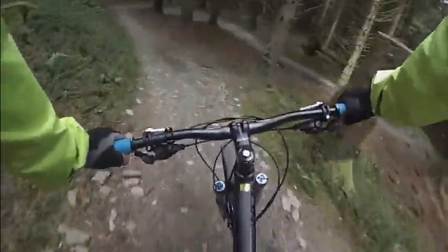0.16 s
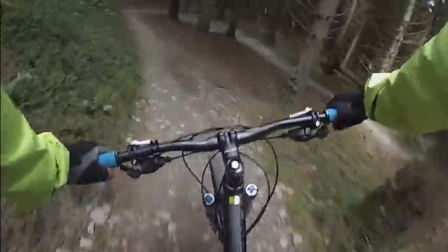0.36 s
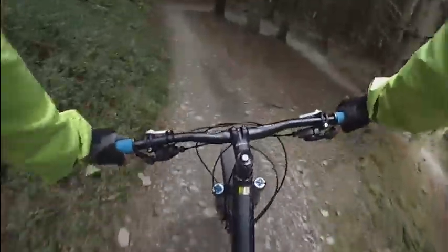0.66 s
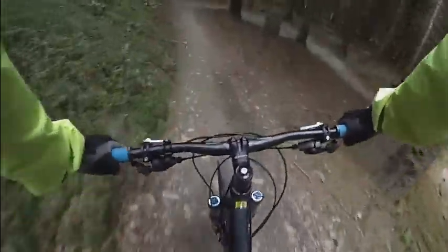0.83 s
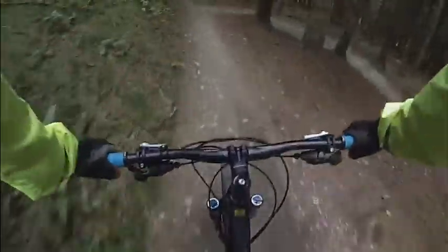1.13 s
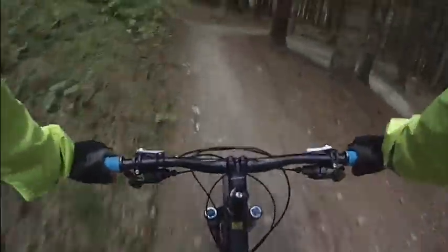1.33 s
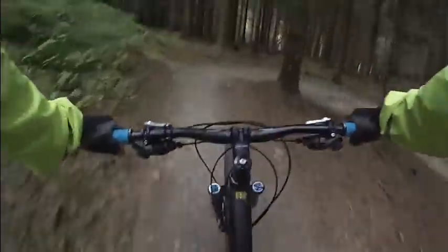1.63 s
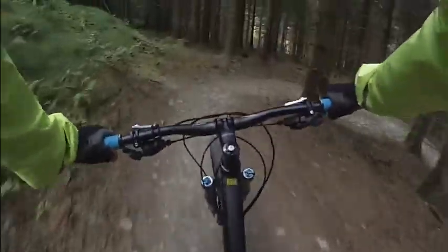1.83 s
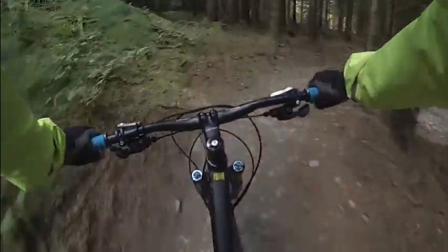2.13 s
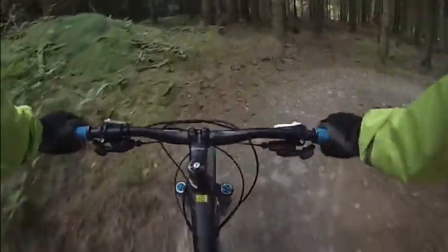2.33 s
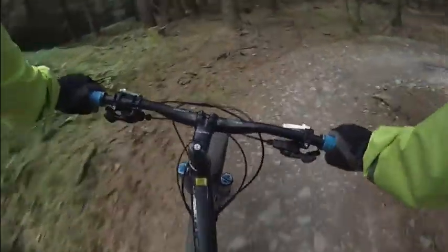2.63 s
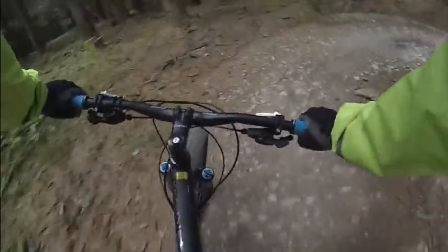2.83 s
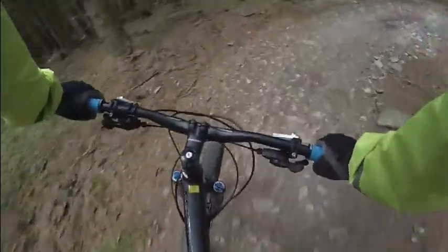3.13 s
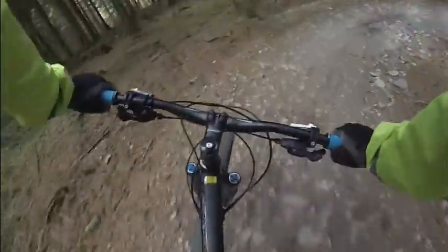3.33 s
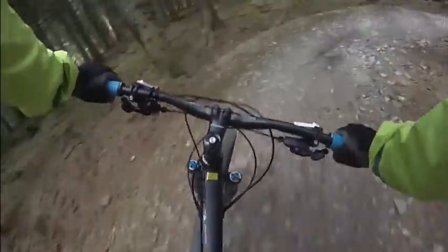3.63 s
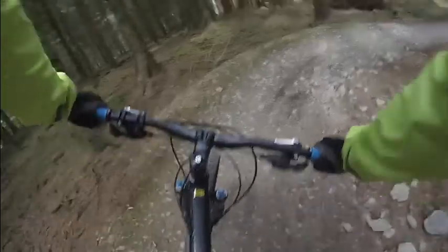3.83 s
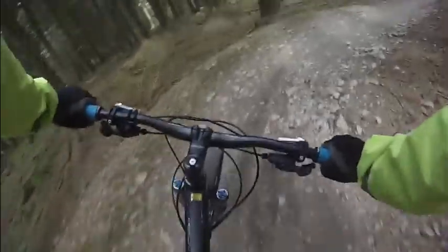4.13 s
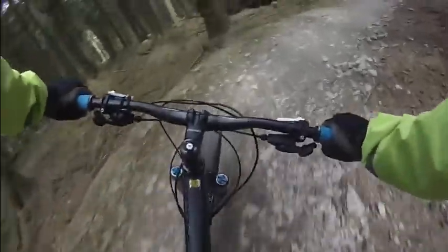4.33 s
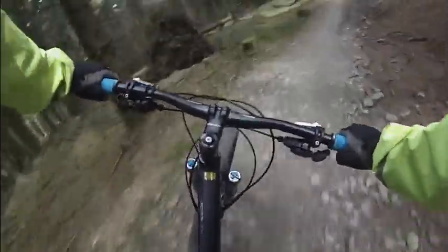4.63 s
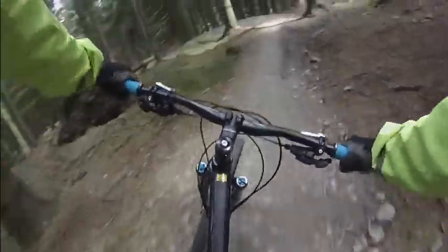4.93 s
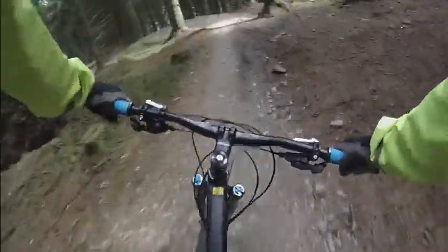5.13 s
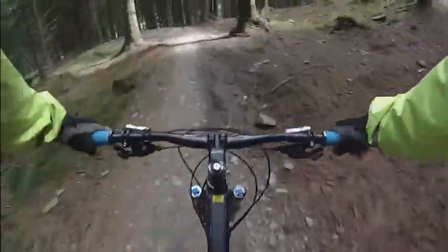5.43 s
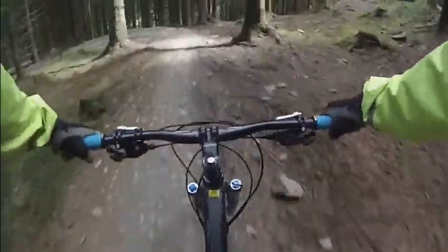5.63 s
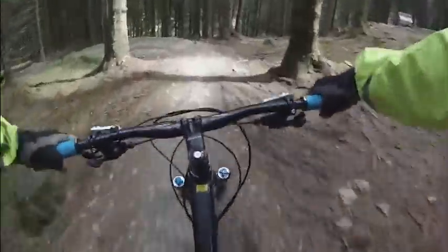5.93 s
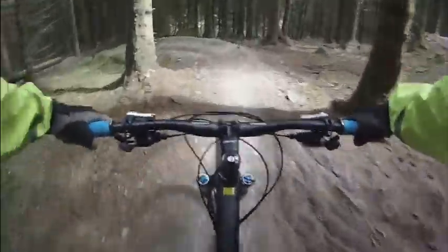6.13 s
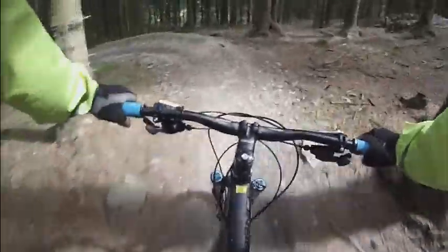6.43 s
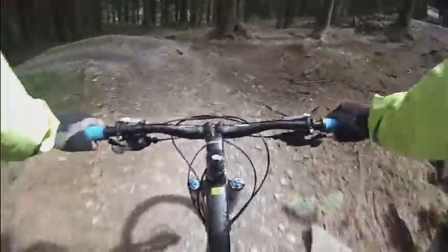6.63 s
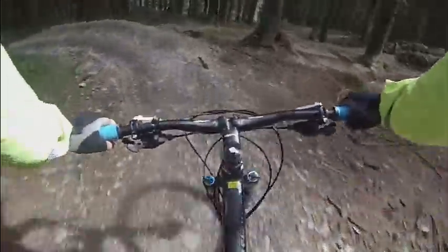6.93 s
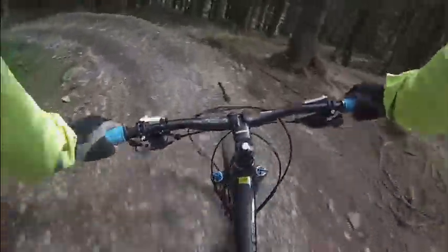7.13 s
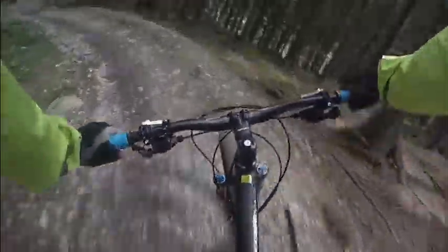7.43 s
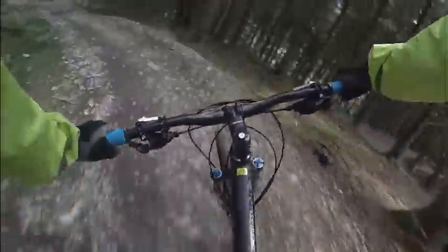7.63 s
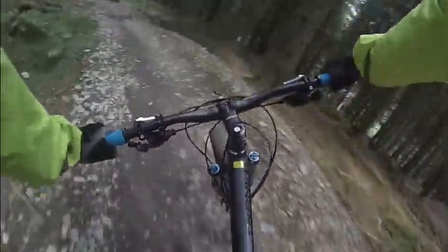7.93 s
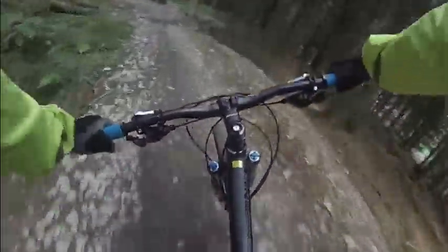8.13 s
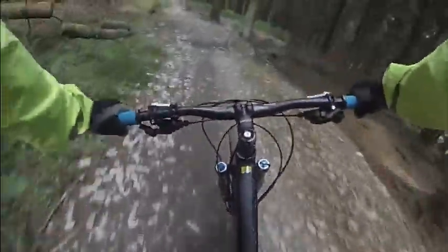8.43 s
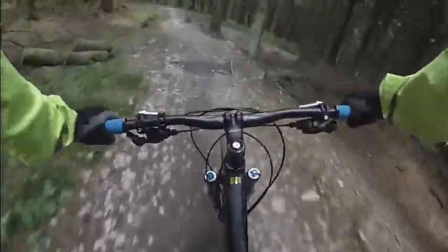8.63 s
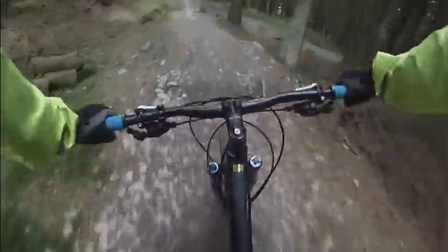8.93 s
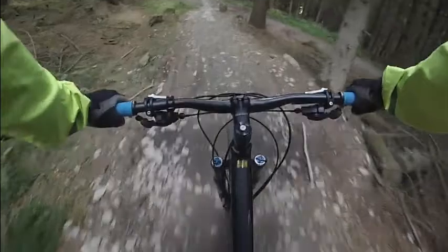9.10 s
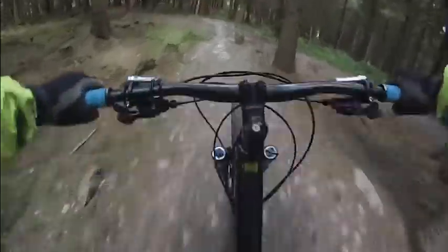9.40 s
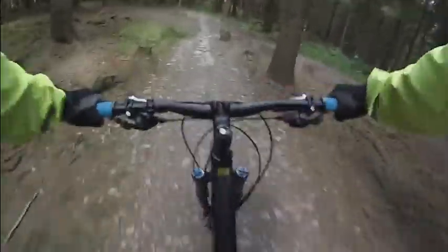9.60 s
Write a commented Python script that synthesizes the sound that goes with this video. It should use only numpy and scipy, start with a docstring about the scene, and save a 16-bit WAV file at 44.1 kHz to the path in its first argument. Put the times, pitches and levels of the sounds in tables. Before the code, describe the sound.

Hard, dry clacks from a loose part on a mountain bike snap loudly over quiet tyre rumble and gritty crunch on a forest dirt trail.

```python
"""Hard clacks over the rumble and crunch of a mountain bike on a dirt trail, heard by the rider's microphone.
A loose hard part near the microphone clacks as decaying sines plus gritty noise; it may rebound or slide.
Tyre rumble, grit and wind are coloured noises that follow how hard the bike rolls.
Stone patches are noise bursts, tyre thumps are decaying sines and gusts are single pressure dips.
A slow limiter ducks everything after a peak and the input flattens what is too loud."""
import sys
import numpy as np
from scipy import signal
from scipy.fft import rfft, irfft, next_fast_len
from scipy.io import wavfile

SR = 44100
rng = np.random.default_rng(int(sys.argv[2]) if len(sys.argv) > 2 else 0)


def log_audio(samples):
    """Write samples as a 16-bit WAV file to the path given in sys.argv[1]."""
    # one column per channel
    frames = np.atleast_2d(samples).T
    # limit to full scale, then quantise
    limited = np.clip(frames, -1, 1)
    pcm = np.round(limited * 32767).astype(np.int16)
    wavfile.write(sys.argv[1], SR, pcm)


N = 430416
TIME = np.arange(N) / SR

# blows of the loose part: (time [s], force [dB], contact grit relative to force [dB],
# rebound [share of force], later slide [gain, 1 = firm, 0 = none])
CLACKS = [(0.0022, 2.5, 7, 0, 0), (1.4625, 8.5, -4.5, 0, 0), (1.5909, 13, 5, 0.081, 0),
          (1.723, 13, -8, .14, .9), (1.9555, -7.5, -14, 0, 0), (2.1207, -0.5, 3, 0.024, 0),
          (2.399, -1.5, -4, 0, 0.16), (2.664, 0, -2, 0.032, 0), (2.73, -23.5, -22, 0.038, 0),
          (4.0001, 10.5, -3.5, .1, 0), (4.381, -47, 2, 0, 0), (4.848, -38.5, 11.5, 0, 0),
          (4.9095, 3.5, -6.5, 0, 0), (5.1151, 1.6, -2.5, 0, 0.11), (5.2153, -45.5, -5, 0.071, 0),
          (5.282, 6, 3.5, 0, 1), (5.4723, 6.5, -5, 0, 1.36), (5.685, -8, -16, 0.026, 0.98),
          (5.9173, 5, 3, 0, 0), (6.08, -19.5, -13, 0, 0.79), (6.259, 1, -12, 0.015, 0.38),
          (6.3607, -32.5, -11, 0.043, 0), (6.4993, 0, 8.5, 0.04, 0.34), (6.6302, -0.5, -3, 0, 0),
          (7.0888, 0.5, -9, 0, 0.6), (7.3411, -2, -18, 0.016, 0.9), (7.487, -38, 12, 0, 0.1),
          (7.5294, -0.6, -8, 0.024, 0), (7.7286, -0.3, -3, 0.022, 0.55), (7.9302, -2, -11, 0.23, 0.17),
          (8.0885, -6.5, 12.5, 0.41, 0.42), (8.278, -4, 6.5, 0.032, 0.036), (8.7962, -0.3, 0, 0, 0.21),
          (8.924, -1, -0.5, .15, 0), (9.0919, -2, -13.5, 0.19, 0.18), (9.3764, 4.5, -13, 0.2, 0.35),
          (9.487, 0.5, 10, 0.44, 0), (9.5059, -11.5, 2.5, 0, 0.58)]
# spectrum of the sliding or rattling part: (frequency [Hz], relative density [dB])
RUB_COLOUR = [(300, -20), (460, 3.5), (620, -25), (950, -4.5), (1450, 2.5), (2050, 0.5), (2700, -13),
              (4000, -33), (4800, -17), (5500, -22), (6300, -22.5), (7500, -39), (14000, -59.5)]


def from_db(db):
    """Decibels to gain."""
    return 10 ** (np.asarray(db) / 20)


def rms_one(x):
    """Scale to an rms of 1."""
    return x / np.sqrt(np.mean(x ** 2) + 1e-20)


def add(out, start_s, sound):
    """Mix a short sound into out at start_s."""
    start = int(np.clip(round(start_s * SR), 0, N - 1))
    out[start:start + len(sound)] += sound[:N - start]


def drift(corner_hz):
    """Smooth random curve of rms 1: noise through two equal low-pass poles, at 1/40 of the sample rate."""
    step, warmup = 40, 2000  # samples, slow samples
    pole = np.exp(-2 * np.pi * corner_hz * step / SR)
    white = rng.standard_normal(N // step + warmup + 2)
    slow = signal.lfilter([1], [1, -2 * pole, pole * pole], white)[warmup:]
    return np.interp(np.arange(N) / step, np.arange(len(slow)), rms_one(slow))


def coloured(x, spectrum):
    """Shape x by a spectrum that falls away below its first point; rms 1."""
    hz, db = np.transpose(spectrum)
    size = next_fast_len(N)
    f = np.fft.rfftfreq(size, 1 / SR) + 1  # +1 keeps the log finite
    gain = from_db(np.interp(np.log(f), np.log(hz), db))
    gain *= np.minimum(f / hz[0], 1) ** 2
    return rms_one(irfft(rfft(x, size) * gain, size)[:N])


def noise(spectrum):
    """Coloured noise of rms 1."""
    return coloured(rng.standard_normal(N), spectrum)


def swell(centre_s, length_s):
    """Raised-cosine bump of height 1."""
    return np.cos(np.pi * np.clip((TIME - centre_s) / length_s, -.5, .5)) ** 2


def struck(modes, count, spread_db, detune, pitch=1):
    """Struck body: decaying sines of alternating sign, with random level and tuning at each blow."""
    hz, db, t60_s = np.transpose(modes)[:, :, None]
    strength, shift = rng.standard_normal((2, len(modes), 1))
    t = np.arange(count) / SR
    sign = (-1) ** np.arange(len(modes))[:, None]
    decay = from_db(db + spread_db * strength - 60 * t / t60_s)
    sines = np.sin(2 * np.pi * hz * (pitch + detune * shift) * t)
    return np.sum(sign * decay * sines, axis=0)


def rolling(follows):
    """Gain that moves `follows` dB per dB of rolling level (speed and tyre load); 1 at an easy pace."""
    # rolling level, joined by straight lines: (time [s], level [dB])
    roll_curve = [(0.0, -70.5), (0.83, -61), (0.95, -51), (1.73, -57), (1.89, -70.5), (2.61, -62.5),
                  (2.79, -67.5), (3.31, -55), (3.73, -53.0), (3.93, -36), (4.09, -59), (4.27, -71),
                  (4.91, -56), (4.95, -71), (5.47, -70.5), (7.41, -66.5), (8.35, -66), (8.83, -60),
                  (9.05, -65), (9.47, -59), (9.76, -66.5)]
    easy_roll_db = -60
    roll_db = np.interp(TIME, *np.transpose(roll_curve))
    return from_db(follows * (roll_db - easy_roll_db))


def wind(wind_db=-47.5, follows=1.15, eddies_db=2.5, eddies_hz=9, buffet_highpass_hz=12):
    """Eddies make a low, fluctuating noise at the microphone; gusts add single pressure dips."""
    # wind spectrum: (frequency [Hz], relative density [dB])
    wind_colour = [(14, 4), (28, 3), (50, -9), (90, -17), (200, -34.5), (500, -67.5)]
    # gusts: (centre [s], length [s], peak before the high-pass [dB])
    buffets = [(1.083, 0.031, -17.5), (1.317, 0.026, -13.5), (3.889, 0.026, -5), (9.521, 0.018, -11.5)]
    eddies = from_db(wind_db + eddies_db * drift(eddies_hz)) * noise(wind_colour)
    dips = np.zeros(N)
    for centre_s, length_s, db in buffets:
        dips -= from_db(db) * swell(centre_s, length_s)
    highpass = signal.butter(1, buffet_highpass_hz, "high", fs=SR, output="sos")
    return rolling(follows) * eddies + signal.sosfilt(highpass, dips)


def tyre_rumble(tyre_db=-56, follows=1.1, lumps_db=5.5, lumps_hz=14):
    """Tyres drum on uneven ground: low noise of wandering level."""
    # tyre spectrum: (frequency [Hz], relative density [dB])
    tyre_colour = [(40, -12), (80, -1.5), (120, 2), (175, -4.5), (250, -18.5), (450, -19.5), (600, -31),
                   (2000, -59)]
    lumps = from_db(tyre_db + lumps_db * drift(lumps_hz))
    return rolling(follows) * lumps * noise(tyre_colour)


def grit(grains_per_s=1800, size_db=2.5, grain_db=-62, hiss_db=-62, clump_db=5.0, clump_hz=38, follows=.85):
    """Grains crack under the tread as random impulses, in clumps, over a smooth rush."""
    # grit spectrum: (frequency [Hz], relative density [dB])
    grit_colour = [(200, -10), (450, 0.5), (650, -3), (1000, -5), (1450, 6), (2200, 3.5), (2800, -3.5),
                   (3700, -4.5), (5000, -10), (6500, -16.5), (8000, -20), (11000, -28.5), (15000, -42)]
    is_grain = rng.random(N) < grains_per_s / SR
    size = np.minimum(rng.exponential(1, N), 4)
    sign = rng.choice([-1, 1], N)
    cracks = is_grain * sign * from_db(size_db * size)
    crunch = from_db(grain_db + clump_db * drift(clump_hz)) * coloured(cracks, grit_colour)
    rush = from_db(hiss_db) * noise(grit_colour)
    return rolling(follows) * (crunch + rush)


def stones(stone_db=-2, knock_db=4.0, knock_hz=120):
    """Tyres plough through loose stones: short, bright, uneven bursts of noise."""
    # stone patches: (centre [s], length [s], level before stone_db [dB])
    patches = [(0.344, 0.044, -50.5), (0.521, 0.012, -42), (0.685, 0.1, -55.5), (1.073, 0.06, -35.5),
               (1.12, 0.051, -39.5), (1.285, 0.051, -41), (1.431, 0.1, -47.5), (3.364, 0.096, -46.5),
               (3.651, 0.056, -44.5), (3.808, 0.042, -38.5), (3.872, 0.042, -29), (3.934, 0.036, -34),
               (4.854, 0.028, -42), (9.535, 0.022, -40.5)]
    # stone spectrum: (frequency [Hz], relative density [dB])
    stone_colour = [(300, -2.5), (900, 0.5), (1600, 12.5), (2400, 11.5), (4800, 2.5), (8000, -12),
                    (11000, -21.5), (15000, -37)]
    envelope = np.zeros(N)
    for centre_s, length_s, db in patches:
        envelope += from_db(db) * swell(centre_s, length_s)
    knocks = from_db(stone_db + knock_db * drift(knock_hz))
    return envelope * knocks * noise(stone_colour)


def thumps():
    """A root sets the tyre casing drumming: a few low, damped modes."""
    # tyre strikes: (time [s], level [dB])
    strikes = [(0.287, -32.5), (.91, -25), (1.073, -23), (.437, -26.5), (1.376, -27), (3.873, -10),
               (9.243, -28), (9.517, -23)]
    # casing modes: (nominal frequency [Hz], mean level [dB], t60 [s])
    casing_modes = [(63, 1, 0.026), (113, -2, .07), (156, -2, 0.022)]
    out = np.zeros(N)
    for s, db in strikes:
        add(out, s, from_db(db) * struck(casing_modes, count=5000, spread_db=1.3, detune=0.042))
    return out


def rubs(rub_db=-43, rough_db=2.0, rough_hz=90, fidget_db=-11, fidget_hz=24):
    """Dry friction of the loose part: noise as it slides and slides back, and a faint stretch of fidgeting."""
    slide_after_s, slide_s = .036, 0.051  # centre after the clack, length
    back_after_s, back_s, back_db = 0.0828, 0.043, -9  # the lighter slide back
    fidget_from_s, fidget_to_s = 6.56, 7.14
    envelope = np.zeros(N)
    for s, *_, slide in CLACKS:
        if slide > 0:
            envelope += slide * swell(s + slide_after_s, slide_s)
            envelope += slide * from_db(back_db) * swell(s + back_after_s, back_s)
    stretch = swell((fidget_from_s + fidget_to_s) / 2, fidget_to_s - fidget_from_s)
    envelope += from_db(fidget_db) * np.maximum(drift(fidget_hz), 0) * stretch
    return envelope * from_db(rub_db + rough_db * drift(rough_hz)) * noise(RUB_COLOUR)


def clacks(soft_hz=7500, stiffening_per_db=0.0034, ring_db=-21,
           metal_db=-70, metal_grows=2.7, metal_limit_db=-52, crack_grows=1.577,
           rattle_db=-15, rattle_t60_s=0.091,
           contact_db=-30, rebound_contact_db=-19, contact_t60_s=0.021, rebound_after_s=.0105):
    """Hard blows: gritty contact, a few cycles of a damped body, a short ring and a faint rattle."""
    # modes below: (nominal frequency [Hz], relative level [dB], t60 [s])
    body_modes = [(1273.7, -3.5, 0.0097), (1449.4, -0.8, 0.012), (1593, -1.78, 0.015), (1836, 4.5, 0.0065),
                  (2130.6, -3.07, 0.012), (2694, -20.5, 0.01), (3120, -9.5, 0.0044), (3092, -21.5, 0.019),
                  (4070, -44.5, 0.0022), (4810, -25, 0.026), (6022, -21, 0.0054), (6233, -22.5, 0.015),
                  (10780, -41, 0.021), (102, -32, 0.045)]  # stiff, heavily damped struck body
    crack_modes = [(2875, -19, 0.0092), (3127, -20, 0.0097), (1890, -13, 0.0037)]  # sharper crack of a hard blow
    ring_modes = [(460, -17.5, .08), (928, -9.5, .075), (2396, -2, .075), (3052, -31, .14),
                  (3610, -27, .13), (4748, -37, .13), (5642, -35, .12)]  # tones that hang on
    metal_modes = [(2848, -8, .95), (3205, -1, .45), (3451, 1, .22), (3610, 5, .16), (5109, -1, .45),
                   (5265, -3, .36), (7230, -7, .18), (7348, -13, .45)]  # thin metal, heard mainly after hard blows
    # spectrum of the gritty contact: (frequency [Hz], relative density [dB])
    contact_colour = [(1200, -12), (2000, 9.5), (2900, 4.5), (4000, -5.5), (5200, 3.5), (6400, 0.5),
                      (8000, -23), (14000, -35.5)]
    body, rings, shake, contact = np.zeros((4, N))
    age_s = TIME[:8000]
    scuff = from_db(-60 * age_s / contact_t60_s)
    for s, force_db, gritty_db, rebound, _ in CLACKS:
        force = from_db(force_db)
        after_db = force_db + ring_db
        pitch = 1 + stiffening_per_db * max(force_db, 0)  # a hard blow stiffens the body
        add(body, s, force * struck(body_modes, count=2000, spread_db=1.0, detune=0.018, pitch=pitch))
        add(rings, s, from_db(after_db) * struck(ring_modes, count=8000, spread_db=3.0, detune=0))
        add(shake, s, from_db(after_db + rattle_db - 60 * age_s / rattle_t60_s))
        add(contact, s, from_db(contact_db + force_db + gritty_db) * scuff)
        # harder contact is shorter: crack and, up to a limit, metal outgrow the force
        crack_gain = from_db(crack_grows * force_db)
        add(body, s, crack_gain * struck(crack_modes, count=2000, spread_db=2.0, detune=0))
        metal_gain = from_db(min(metal_db + metal_grows * force_db, metal_limit_db))
        add(rings, s, metal_gain * struck(metal_modes, count=24000, spread_db=0.5, detune=0))
        # the rebound is a glancing touch, with no ring of its own
        touch, touch_s = rebound * force, s + rebound_after_s
        add(body, touch_s, touch * struck(body_modes, count=2000, spread_db=0.32, detune=0.016))
        add(contact, touch_s, touch * from_db(rebound_contact_db) * scuff)
    # the surfaces give a little, which rounds the first edge
    body = signal.sosfilt(signal.butter(2, soft_hz, fs=SR, output="sos"), body)
    rattle = shake * noise(RUB_COLOUR)
    return body + rings + rattle + contact * noise(contact_colour)


def limiter(x, threshold_db=0.5, attack_s=.005, release_db_per_s=45):
    """Ducks the level after a peak, too late to catch its onset, and recovers steadily in dB."""
    over_db = np.maximum(20 * np.log10(np.abs(x) + 1e-9) - threshold_db, 0)
    recovery_db = release_db_per_s * TIME
    held_db = np.maximum.accumulate(over_db + recovery_db) - recovery_db
    pole = np.exp(-1 / (attack_s * SR))
    reduction_db = signal.lfilter([1 - pole], [1, -pole], held_db)
    return x * from_db(-reduction_db)


def scene():
    """All sources add up at one microphone in the open air."""
    trail = wind() + tyre_rumble() + grit() + stones() + thumps()
    return (trail + rubs() + clacks())[None]


def record(dry, top=0.86, cutoff_hz=15800):
    """The limiter ducks, the input flattens peaks towards `top`, and a steep low-pass ends the band."""
    limited = limiter(dry[0])[None]
    clipped = limited / (1 + (limited / top) ** 10) ** (1 / 10)
    lowpass = signal.ellip(10, .1, 80, cutoff_hz, fs=SR, output="sos")  # 0.1 dB ripple, 80 dB stopband
    return signal.sosfilt(lowpass, clipped)


dry = scene()
out = record(dry)
log_audio(out)
```